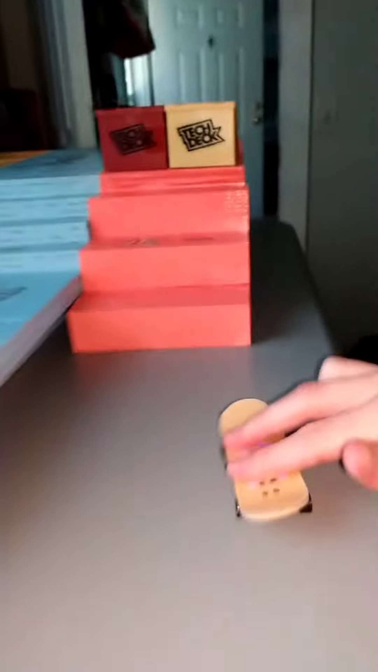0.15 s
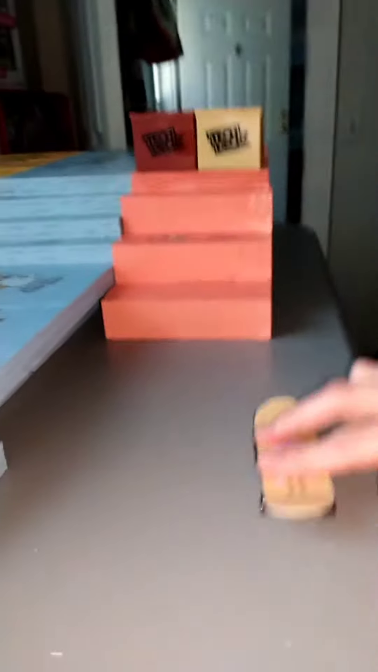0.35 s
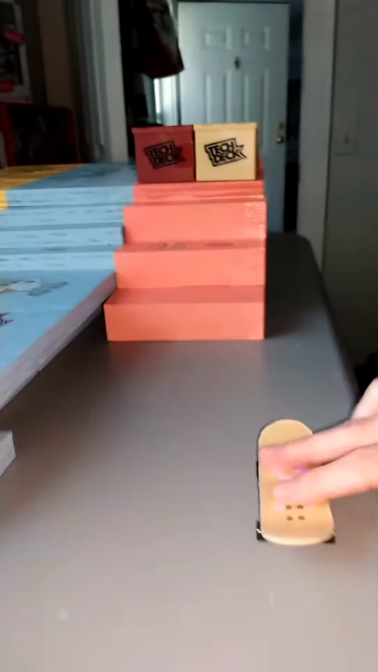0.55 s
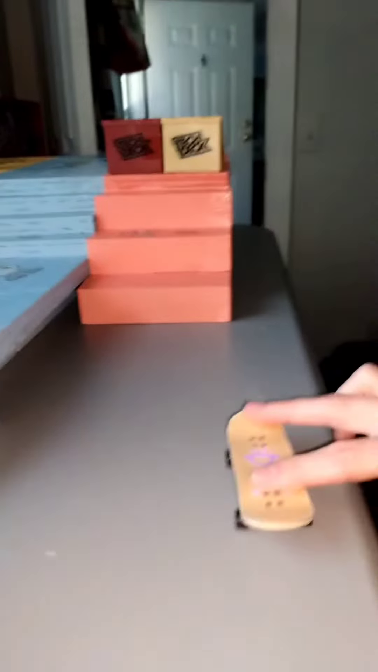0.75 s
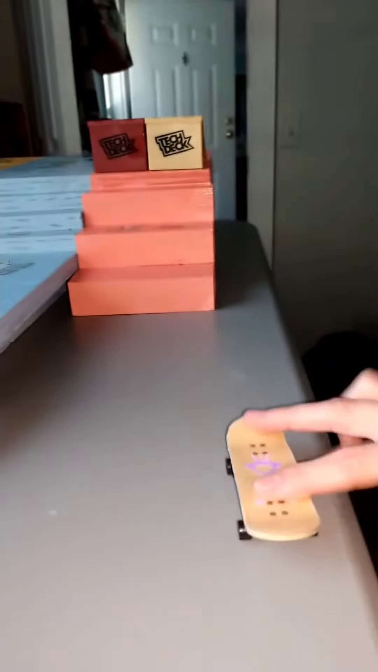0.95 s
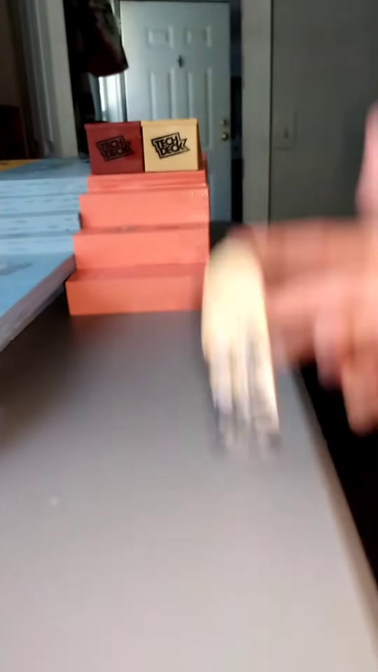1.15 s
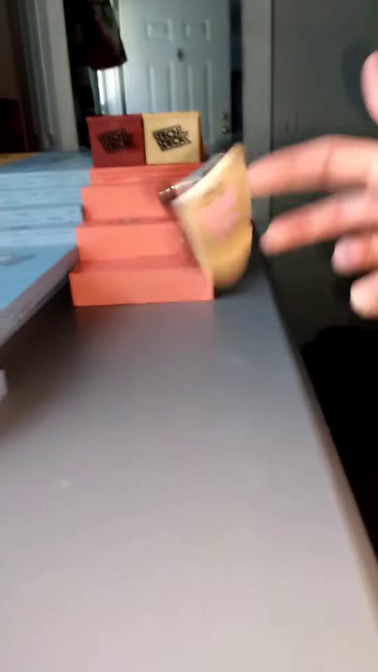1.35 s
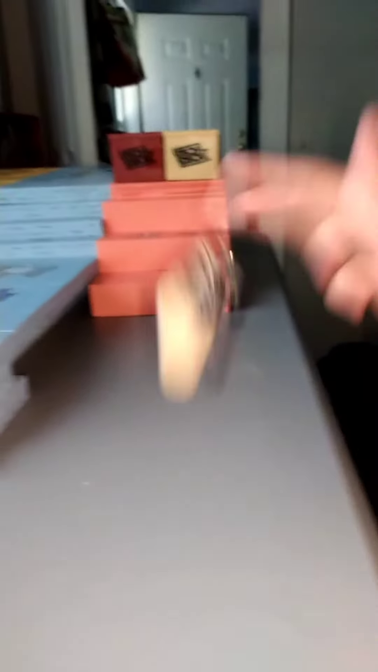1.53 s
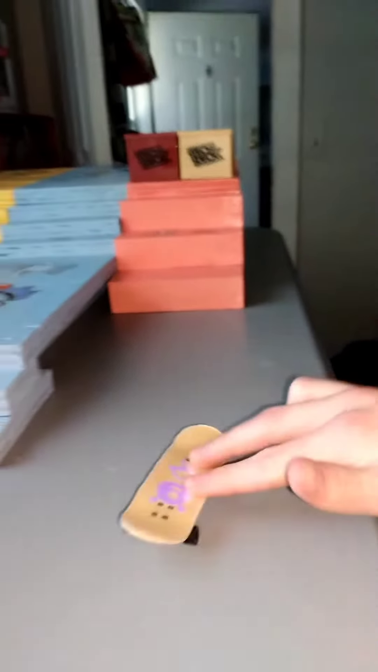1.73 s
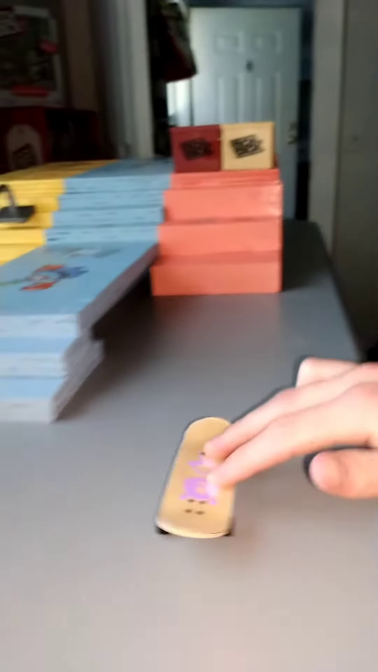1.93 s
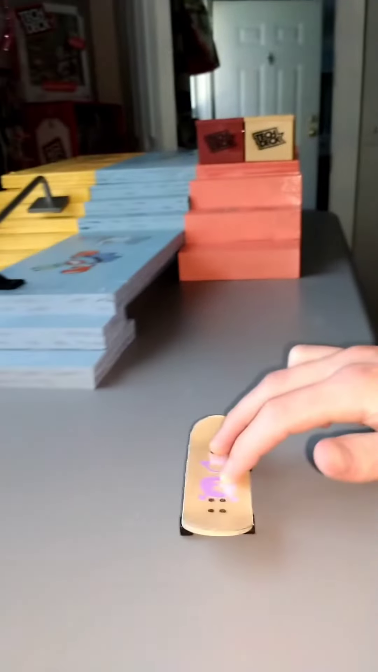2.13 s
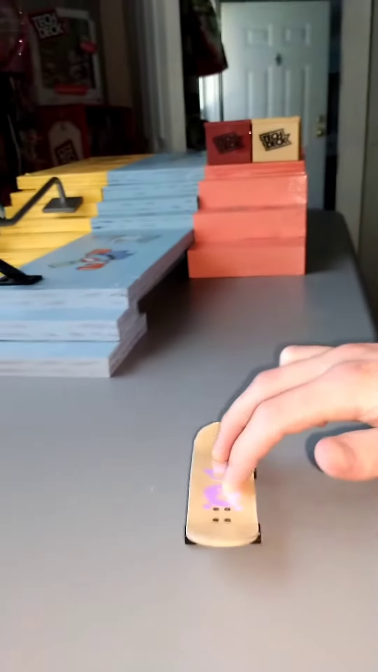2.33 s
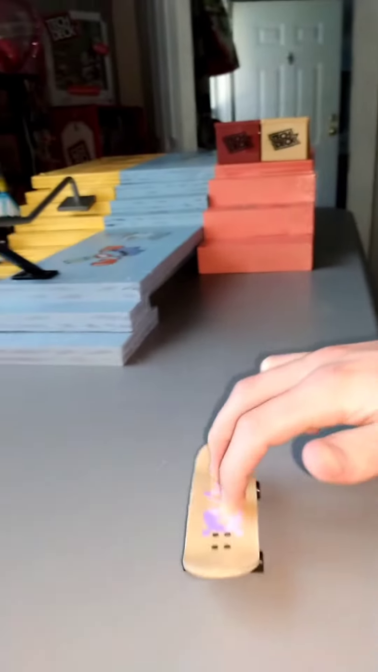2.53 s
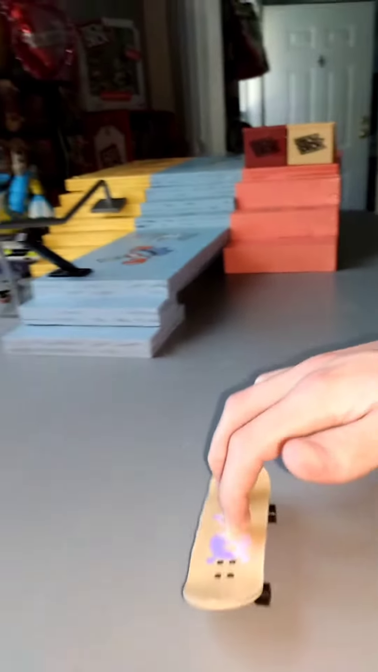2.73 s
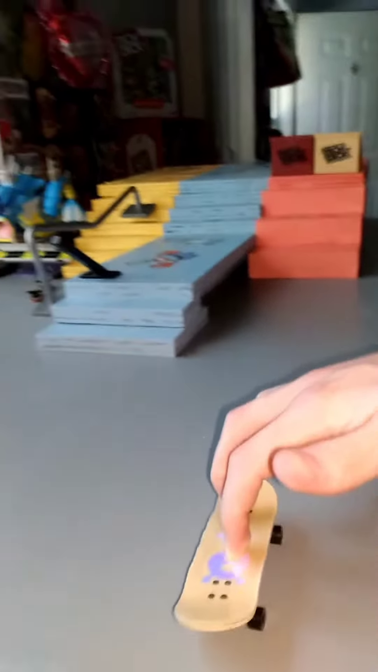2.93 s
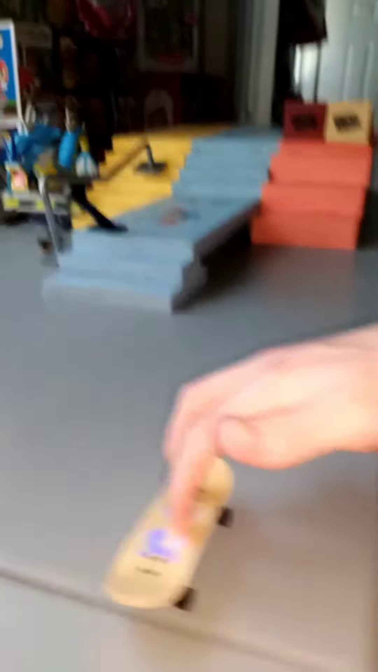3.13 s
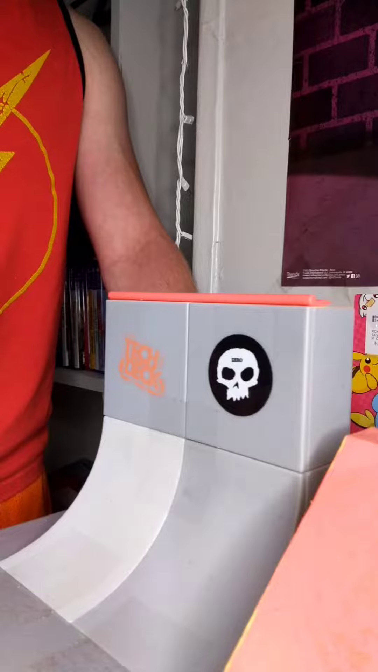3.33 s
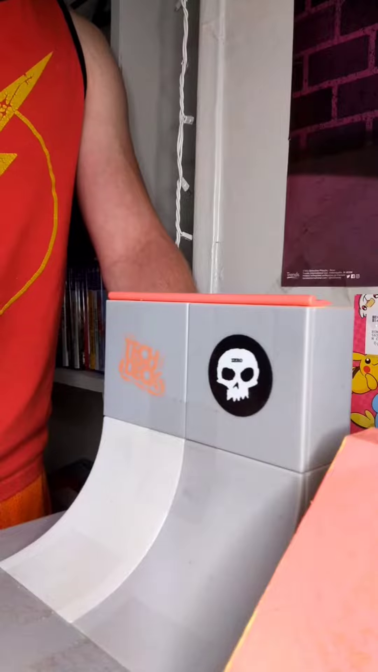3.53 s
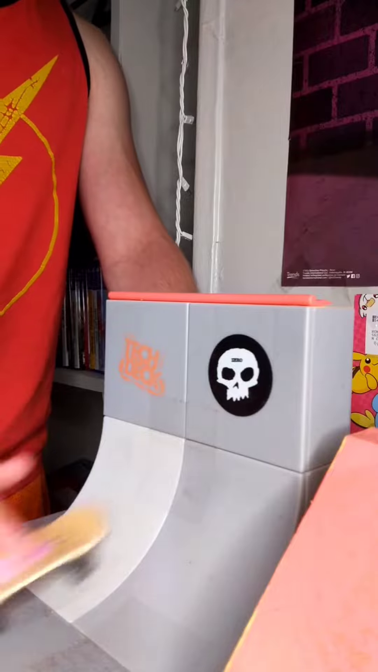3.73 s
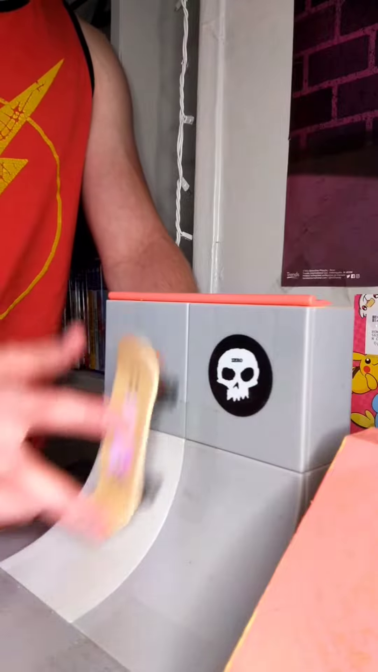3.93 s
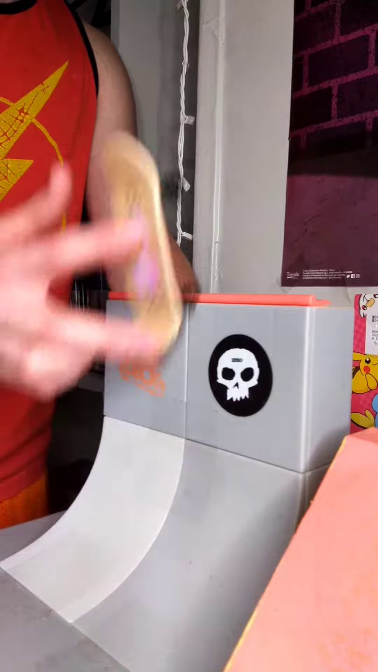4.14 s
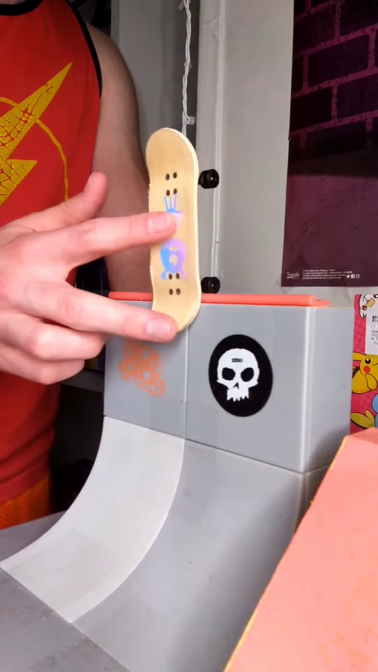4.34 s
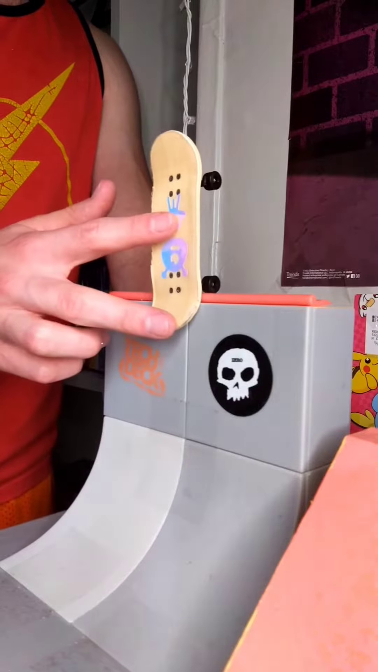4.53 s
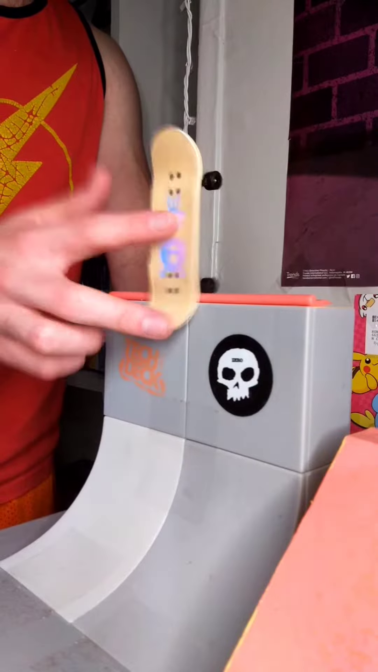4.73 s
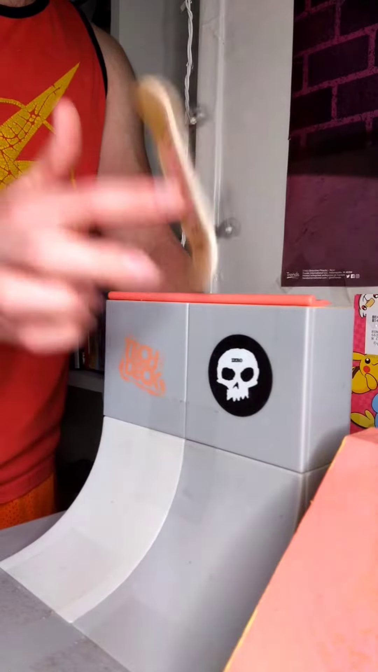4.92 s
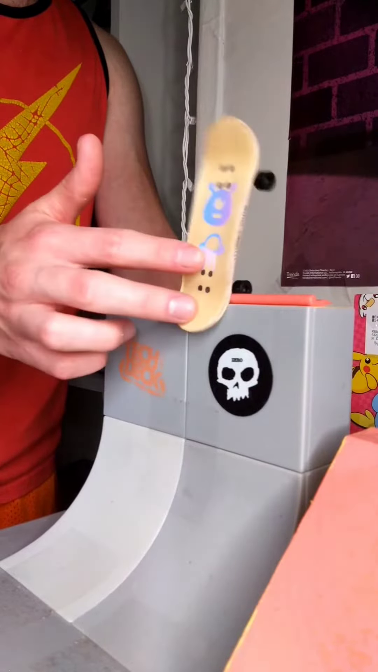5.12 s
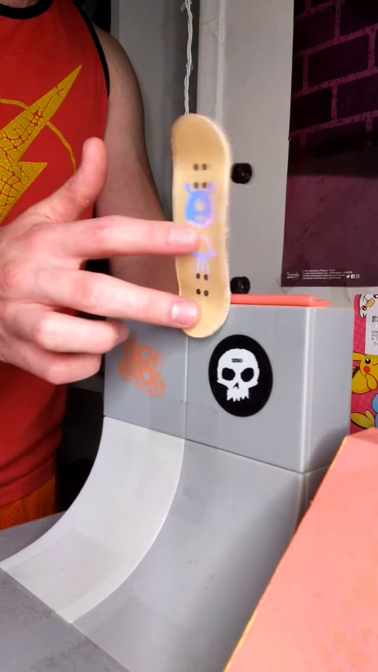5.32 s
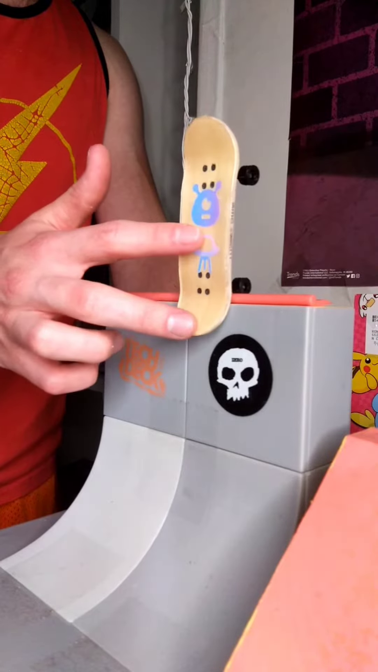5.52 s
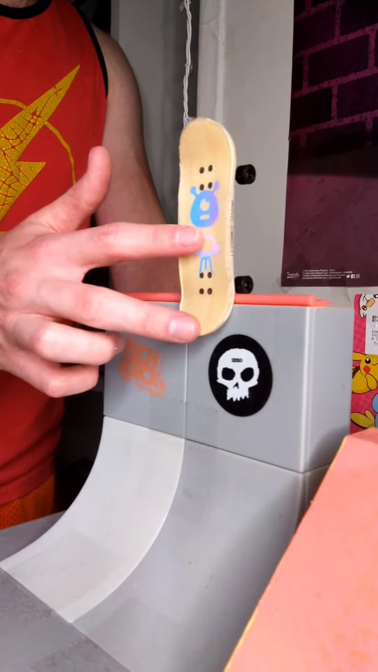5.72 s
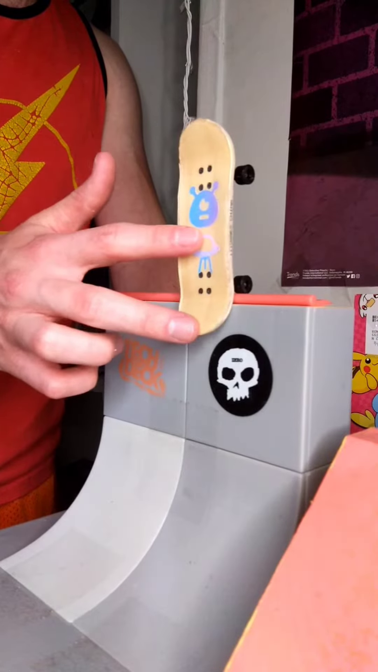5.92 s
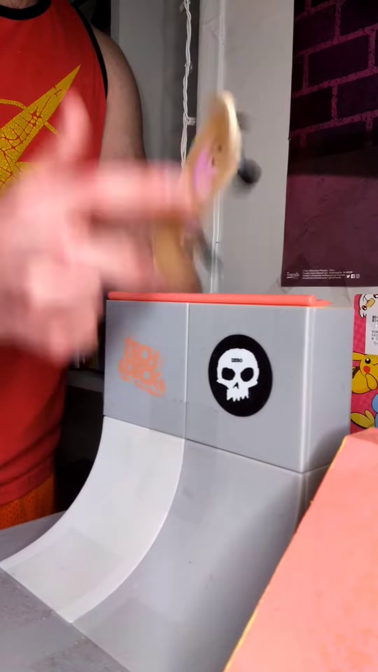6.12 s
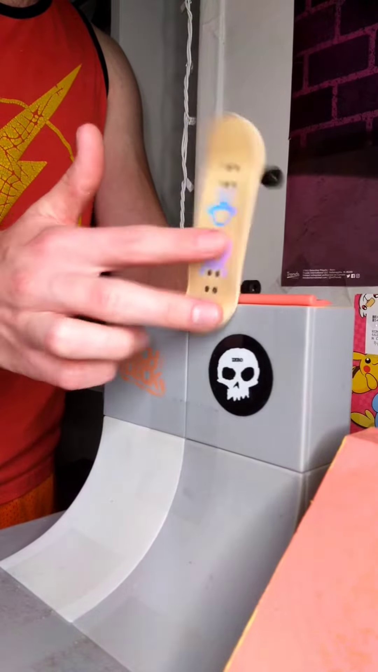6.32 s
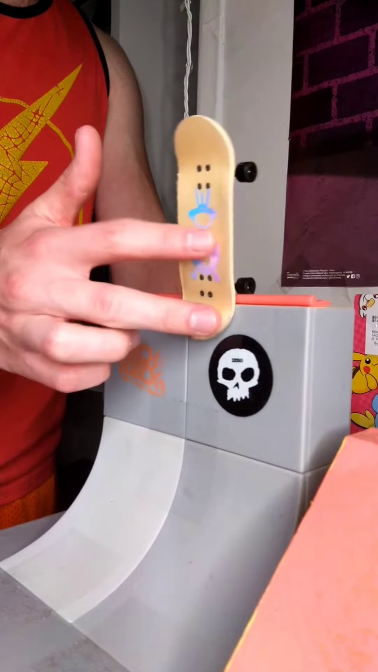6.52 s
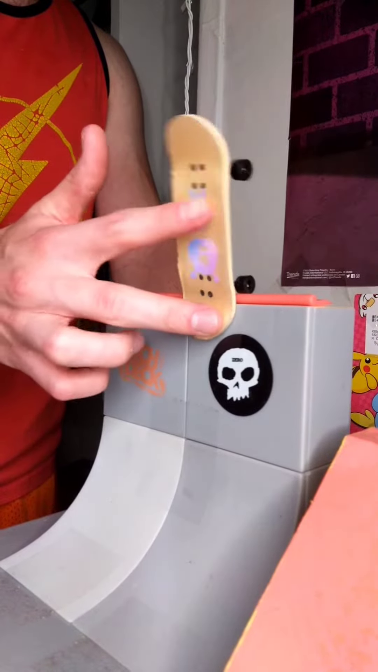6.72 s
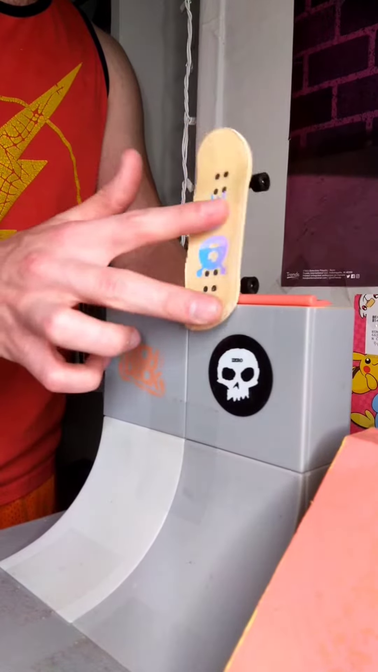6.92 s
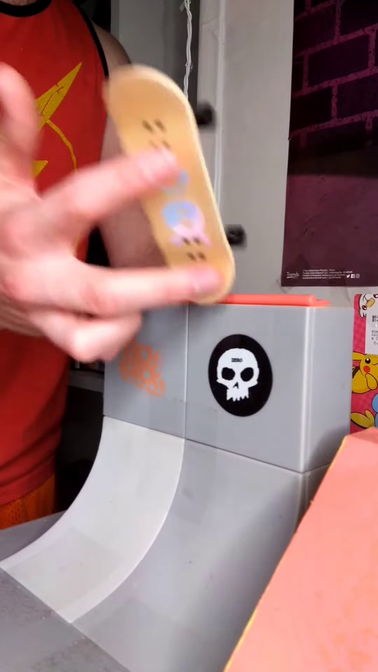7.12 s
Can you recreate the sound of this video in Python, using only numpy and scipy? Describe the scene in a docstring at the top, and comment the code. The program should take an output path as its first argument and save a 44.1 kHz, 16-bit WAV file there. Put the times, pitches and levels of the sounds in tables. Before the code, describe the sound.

A tiny wooden skateboard pops and lands with loud overloaded clacks on a table, rolls faintly, then rides up a hollow plastic ramp with lighter clicks.

```python
"""A small wooden fingerboard pops, lands and rolls on a table top, then rides up a hollow plastic ramp
and is flipped on its lip. Knocks are noise bursts and rolling is gritty noise; both drive the damped
modes of deck, axles and the surface below, a low thump and, on the slope, a gliding hollow resonance.
The room answers briefly over a rumbling room tone. A narrow-band phone microphone overloads, and the
signal briefly drops out."""
import sys
import numpy as np
from scipy import signal
from scipy.fft import rfft, irfft
from scipy.io import wavfile
from scipy.ndimage import uniform_filter1d

SR = 44100
rng = np.random.default_rng(int(sys.argv[2]) if len(sys.argv) > 2 else 0)


def to_wav(s):
    """Save 16-bit WAV."""
    ch = np.atleast_2d(s).T  # columns
    pcm = np.round(np.clip(ch, -1, 1) * 32767)  # PCM
    wavfile.write(sys.argv[1], SR, pcm.astype(np.int16))


N = 320339

# Surface below, start of each stretch [t/s]: table edge, table middle, ramp slope, ramp lip; last is the end
SURFACE_FROM_S = [0, 1.09, 3.13, 4.17, 8]


def gain_of(db):
    """Amplitude factor of a level in dB."""
    return 10 ** (np.asarray(db) / 20)


def evened(x):
    """Scales to RMS 1."""
    return x / np.sqrt(np.mean(x ** 2) + 1e-20)


def smoothed_twice(x, size_1, size_2):
    """Two moving averages in a row."""
    return uniform_filter1d(uniform_filter1d(x, size=size_1), size=size_2)


def patches_of(noise, frames, bins):
    """Smooths noise [bin, frame] into time-frequency patches of RMS 1."""
    return evened(uniform_filter1d(uniform_filter1d(noise, size=bins, axis=0), size=frames, axis=1))


def read(points, hz):
    """Interpolates a table of (f/Hz, value) over log frequency."""
    f, value = np.transpose(points)
    return np.interp(np.log(hz + 1), np.log(f + 1), value)


def body(modes, lo_hz, hi_hz, broad_db):
    """Impulse response to one tap: decaying modes plus a direct broadband click, band-passed, energy 1."""
    t = np.arange(6000) / SR
    rings = np.zeros(len(t))
    for k, (hz, width_hz, db) in enumerate(modes):
        width_hz = max(width_hz, hz / 90, 16)  # wood and plastic damp quickly
        decay = np.exp(-np.pi * width_hz * t)
        level = (-1) ** k * gain_of(db) * width_hz / SR * 2 * np.pi
        rings += level * decay * np.sin(2 * np.pi * hz * t)
    rings[0] += gain_of(broad_db)
    band = signal.butter(2, [lo_hz, hi_hz], "band", fs=SR, output="sos")
    rings = signal.sosfilt(band, rings)
    return rings / np.linalg.norm(rings)


def resonate(x, hz, width_hz):
    """Gliding resonance: shifts the curve hz to zero, smooths, shifts back; white noise keeps its power."""
    turn = np.exp(2j * np.pi * np.cumsum(hz) / SR)
    r = np.exp(-np.pi * width_hz / SR)
    smooth = signal.lfilter([1], [1, -r], x / turn)
    return np.sqrt(2 * (1 - r ** 2)) * (turn * smooth).real


def hum():
    """Room tone: noise shaped by a spectrum: lumpy low rumble that swells, fuzzy drone, faint steady hiss."""
    # Relative spectrum [f/Hz, density/dB per Hz]
    spectrum = [(15, -31), (25, 0.5), (54, 0), (129, -14), (168, 2.5), (209, -40.5), (242, -13), (273, -29),
                (789, -31.5), (890, -33.5), (1510, -37.5), (8000, -50.5), (10400, -88), (17600, -120)]
    upper_db, rumble_db = -39, -46  # gain well above and well below 220 Hz
    swell_rms_db, patchy_rms_db = 3, 2.5
    frames, hz = N // 512 + 5, np.fft.rfftfreq(2048, 1 / SR)
    a, b, lumps = rng.standard_normal((frames, 1025, 3)).T
    lumps = patches_of(lumps, 6, 8)
    swell = evened(uniform_filter1d(rng.standard_normal(frames), size=16))
    low_db = rumble_db - upper_db + swell_rms_db * swell
    z = (a + 1j * b) * gain_of(read(spectrum, hz)[:, None] + patchy_rms_db * lumps)
    z /= np.sqrt(np.mean(signal.istft(z, nperseg=2048, noverlap=1536)[1] ** 2))
    z *= gain_of(upper_db + low_db / (1 + (hz[:, None] / 220) ** 4))
    return signal.istft(z, nperseg=2048, noverlap=1536)[1][:N]


def room(x):
    """Reverb: sparse taps of random sign, one in every 20 samples, each band dying at its own speed."""
    # Decay per band [f/Hz, time constant/s]; 60 dB of fall takes this times 0.019 / 0.015
    decay_s = [(150, 0.13), (400, 0.23), (1000, 0.2), (2800, 0.22), (7300, 0.2)]
    taps = np.zeros(SR)
    at = np.arange(200, SR - 20, 20) + rng.integers(0, 20, (SR - 201) // 20)
    taps[at] = rng.choice([-1., 1.], at.shape)
    hz, t, z = signal.stft(taps, SR, nperseg=256)
    late = np.logaddexp(0, (t - .06) / 0.019) * 0.015  # echoes stay even up to 0.06 s, then decay
    fade = gain_of(-60 * late / read(decay_s, hz)[:, None])
    tail = signal.istft(z * fade, SR, nperseg=256)[1]
    return signal.oaconvolve(x, tail / np.linalg.norm(tail))[:N]


def thump(knock_drive, surface_roll):
    """Low thump: two modes below 190 Hz, shaken by knocks and by rolling on the table."""
    t = np.arange(N) / SR
    on_table = t < SURFACE_FROM_S[2]
    drive = knock_drive + gain_of(-7.5) * surface_roll * on_table
    modes = [(67.8, 17, 0.017), (135, 16, 0.0097)]  # f/Hz, width/Hz, level/dB
    return signal.oaconvolve(drive, body(modes, 33, 190, -28.0))[:N]


def hollow(surface):
    """Hollow under the slope: a resonance of the surface drive, mostly rising as the wheels climb."""
    # Cavity track [t/s, f/Hz, level/dB re surface drive]
    track = [(3.3, 315, 10.5), (3.5, 363, -4.5), (3.598, 460, 1), (3.72, 460, -2), (3.799, 717, 0),
             (3.899, 796, -7), (4.1, 560, -19), (4.17, 607, 8)]
    t = np.arange(N) / SR
    s, hz, db = np.transpose(track)
    on_slope = (t > s[0]) * (t < s[-1])
    drive = surface * on_slope * gain_of(np.interp(t, s, db))
    return resonate(drive, np.interp(t, s, hz), 33)


def grit(per_s, spread_db, smooth):
    """Force on rolling wheels: specks of uneven size over a smooth rub, in short scrapes; RMS 1."""
    size_db = spread_db * np.minimum(rng.exponential(1, N), 3)
    size = gain_of(size_db) * rng.standard_normal(N)
    specks = evened(size * (rng.random(N) < per_s / SR))
    scrapes = gain_of(1.9 * evened(smoothed_twice(rng.standard_normal(N), 300, 150)))
    return evened(scrapes * (specks + smooth * rng.standard_normal(N)))


def rolls():
    """Drive of deck, surface and axles: grit under the level curves of rolls and scrapes."""
    # Wheel force at table edge, in table middle, up the slope; each [t/s, deck/dB, surface/dB]
    roll_levels = [
        [(.74, -61, -62), (.757, -41.5, -55), (.825, -49, -47), (.887, -43, -51), (.905, -41.5, -50.5),
         (1.001, -39, -52), (1.021, -46, -54.5), (1.09, -55, -48)],
        [(1.92, -38.5, -39), (2.04, -46.5, -29.5), (2.126, -52, -44), (2.3, -63, -45), (2.44, -47.5, -37.5),
         (2.592, -58, -40), (2.73, -56, -36), (2.782, -52, -47), (2.896, -62, -49.5), (2.968, -44, -50),
         (3.115, -51.5, -39.5)],
        [(3.3, -65, -50.5), (3.395, -45.5, -43), (3.487, -25.5, -27.5), (3.72, -29, -28.5),
         (3.781, -37.5, -28.5), (3.795, -22, -24), (3.905, -25, -28), (3.999, -49, -41.5), (4.012, -36.5, -33),
         (4.065, -23, -31), (4.123, -26.5, -38), (4.17, -45.5, -58)],
    ]
    # Axle level re deck in each roll [level/dB]
    axles_re_deck_db = [-15, -15, -6.5]
    # Short scrapes and rattles, one a faint noise swell just before a landing; quick rise, steady fade:
    # [peak t/s, rise/s, fade/dB per s, deck/dB, surface/dB, axles/dB]
    scrape_levels = [(.33, 0.023, 322, -38, -45, -45), (0.491, 0.2, 157, -40, -46, -50),
                     (.538, .03, 320.5, -37, -45.5, -58), (.658, .04, 300, -44, -41, -54),
                     (1.135, 0.043, 141, -23, -25, -24.5), (1.645, 0.021, 104, -58, -37, -37),
                     (1.898, 0.049, 295.5, -33, -30, -35), (3.162, 0.012, 230.5, -47.5, -41, -52.5),
                     (4.769, 0.025, 171.5, -45, -45.5, -40.5), (6.135, 0.03, 250.5, -45, -50.5, -41.5),
                     (7.05, 0.0097, 280.5, -44.5, -48.5, -46.5)]
    rise_db = 22  # climb during the rise time
    bump_rms_db, bump_s = 2, 0.031  # random jolts of the force
    t = np.arange(N) / SR
    level = np.zeros((3, N))
    for rows, axles_db in zip(roll_levels, axles_re_deck_db):
        s, deck_db, surface_db = np.transpose(rows)
        fade = np.clip(np.minimum(t - s[0], s[-1] - t) / .01, 0, 1)
        curves_db = [np.interp(t, s, c) for c in (deck_db, surface_db, deck_db + axles_db)]
        level += fade * gain_of(curves_db)
    span = round(bump_s * SR)
    level *= gain_of(bump_rms_db * evened(smoothed_twice(rng.standard_normal(N), span, span)))
    for peak_s, rise_s, fade_db_per_s, *db in scrape_levels:
        after = t - peak_s
        shape_db = np.minimum(rise_db * after / rise_s, -fade_db_per_s * after)
        level += gain_of(db)[:, None] * gain_of(shape_db)
    return level * grit(4000, 3.3, 2.2)


def knocks():
    """Drive of deck, surface, axles and thump, light and hard: a short cluster of contacts per knock."""
    # Knocks [t/s, deck/dB, surface/dB, axles/dB, contact/ms (2 at least)]
    hits = [(0.0513, -5.5, 5, -4.5, 2.56), (0.0649, -12.5, -5, -43, 5.4), (0.1207, 3, 1.5, 3, 7.4),
            (0.1322, 9.5, 0, 7, 3.2), (0.1413, 17.5, 16, 12.5, 2.27), (0.4803, -23, -52, -45, 4.6),
            (0.6391, -29.5, -39, -49, 12.6), (0.6551, -27.5, -50, -44, 2.5), (0.81, -43, -41, -33.5, 2.1),
            (1.0938, -15.5, -27.5, -25, 16), (1.1035, -3, -18, -2.5, 1.6), (1.1189, -2.5, -14, -3, 1.66),
            (1.6523, -3.5, -4.5, 6.5, 1.5), (1.6842, -5, 3.5, -20, 2.6), (1.6858, -9, -17, -4.5, 11),
            (1.6968, 0, 2, -9, 9.3), (1.7064, 15, 14.5, 14.5, 2.96), (1.9622, -20.5, -36, -32, 1.8),
            (1.9879, -20.5, -41.5, -36, 3.3), (2.4309, -30, -50, -53, 3.2), (2.6607, -47.5, -29, -46, 4.4),
            (2.7577, -42, -53.5, -36.5, 2.5), (2.9281, -39.5, -31.5, -42.5, 2.4),
            (2.9631, -27.5, -28.5, -43, 2.8), (3.0874, -36, -47, -44, 3.5), (3.3122, -39, -50, -51.5, 3),
            (3.79, -14, -19.5, -24, 2.9), (3.8126, -15, -7.5, -10, 1.5), (3.831, -10.5, -18, -17, 3.7),
            (3.8435, -21, -26, -9.5, 2.4), (3.8906, -8, -14, -8.5, 1.6), (3.943, -33, -30, -15.5, 2.7),
            (4.0059, -10.5, -22, -12, 2.4), (4.055, -17, -37, -28, 2.8), (4.18, -13.5, -50, -17.5, 3.7),
            (4.2066, -15, -25, -15.5, 6), (4.2412, -19, -14, -12.5, 3), (4.7601, -43, -46, -24.5, 2.4),
            (4.793, -31, -45, -50, 2.8), (4.9021, -40, -59, -46, 1.7), (4.9512, -31, -6.5, 0, 2.9),
            (4.958, -28, -7.5, -4, 2.9), (4.996, -21, -19.5, -11.5, 6), (5.0292, -21, -12, 0.5, 2.9),
            (5.035, -2, -17.5, -23, 3), (5.044, -19, -34, -11.5, 3.6), (5.375, -39, -41, -45.5, 9.8),
            (5.695, -31.5, -32, -35, 3.6), (6.112, -44, -45, -39, 3.5), (6.136, -31.5, -40, -42, 3.8),
            (6.2594, -20, -29.5, -8, 4.8), (6.2647, -9, -20, 1.5, 4.1), (6.27, -6, -16, -8, 4.5),
            (6.2933, -12, -14, -11.5, 2.9), (6.34, -23.5, -24, -23, 6.2), (7.0336, -34.5, -40, -24, 5.3)]
    # Thump level on each surface at 0 dB surface drive [level/dB]
    thump_base_db = [-24, -26.5, -27.5, -19]
    thump_slope = 0.36  # dB of thump per dB of surface drive
    drive = np.zeros((2, 4, N))
    after_s = np.arange(4096) / SR
    for (s, *db, contact_ms), noise in zip(hits, rng.standard_normal((len(hits), 4096))):
        below = np.searchsorted(SURFACE_FROM_S, s) - 1
        db.append(thump_base_db[below] + thump_slope * db[1])
        u = 1000 * after_s / max(contact_ms, 2)
        hard = np.clip(1 + max(db) / 30, .1, 1)
        shape = np.exp(-u) * (1 - np.exp(-u / (.5 - 0.09 * hard)))  # light taps build up more softly
        # flat spectrum: the contacts together push all frequencies alike
        burst = irfft(np.exp(1j * np.angle(rfft(noise * shape))))
        burst *= shape / np.sqrt(uniform_filter1d(burst ** 2, size=32) + 1e-9)
        at = round(s * SR)
        share = np.sqrt([[[1 - hard]], [[hard]]])
        drive[:, :, at:at + 4096] += share * gain_of(db)[:, None] * burst
    return drive


def ring(deck, surface, axles, broad_db):
    """The forces ring the axles, the deck as the fingers hold it and whichever surface is below."""
    # Modes of each surface [f/Hz, width/Hz, level/dB]; body() sets a least width, here and below
    table_edge = [(288, 610, -5), (400, 60, -8.5), (574, 55, -1), (954, 30, -6.5), (1025, 77, 2.5)]
    table_middle = [(230, 75, 3.5), (289, 70, 7), (360, 23, 9.5), (430, 74, -13.5), (778, 49, -12.5),
                    (786, 60, -12.5), (930, 56, -4.5)]
    ramp_slope = [(322, 17, -2), (458, 27, 5), (823, 430, 5.5), (1213, 80, 11)]
    ramp_lip = [(244, 180, -10.5), (498, 30, -1), (640, 280, -3.5), (774, 44, 5.5), (1250, 26, -5)]
    # Low cutoff of each surface [f/Hz]
    surface_low_hz = [172, 168, 222, 182]
    # Deck modes at each place [f/Hz, width/Hz, level/dB]
    deck_at_edge = [(1529, 52, 1.5), (1800, 19, -4.5), (2376, 80, -1), (2520, 23, -0.5), (2840, 89, -3),
                    (3260, 28, -1.5), (3596, 36, -4), (3824, 41, -12.5), (4070, 29, -11), (4350, 95, -8),
                    (5740, 71, -9.5)]
    deck_at_middle = [(1548, 64, -1), (2170, 120, 3), (2570, 33, -2.5), (2784, 37, -10.5), (3480, 58, -4),
                      (3560, 120, -7), (4390, 99, -10), (4860, 42, -4), (5350, 49, -13)]
    deck_on_slope = [(1613, 290, 5.8), (2310, 410, 6.4), (2820, 160, 7.4), (3090, 120, 8.4),
                     (3625, 265, 8.5), (4660, 1170, 1.7)]
    deck_on_lip = [(2366, 24, -12), (2727, 34, -5), (3180, 130, -4.5), (3440, 65, -2), (4440, 520, -12.5),
                   (4680, 75, -4.5), (5060, 53, -9), (5280, 33, -5), (5630, 41, -6), (6140, 88, 3.5)]
    # Start of each deck mode set, then the end [t/s]
    deck_from_s = [0, 1.645, 3.13, 4.17, 8]
    # Axle modes [f/Hz, width/Hz, level/dB]
    axle_modes = [(4590, 96, -4), (5780, 60, 2), (6510, 150, 4.5), (7066, 420, 4), (7783, 160, -3)]
    surfaces = [table_edge, table_middle, ramp_slope, ramp_lip]
    decks = [deck_at_edge, deck_at_middle, deck_on_slope, deck_on_lip]
    t = np.arange(N) / SR
    out = signal.oaconvolve(axles, body(axle_modes, 4500, 9000, broad_db + 3))[:N]
    for k in range(4):
        here = (t >= SURFACE_FROM_S[k]) & (t < SURFACE_FROM_S[k + 1])
        surface_body = body(surfaces[k], surface_low_hz[k], 1300, broad_db + 2.0)
        out += signal.oaconvolve(surface * here, surface_body)[:N]
        here = (t >= deck_from_s[k]) & (t < deck_from_s[k + 1])
        deck_body = body(decks[k], 1500, 5400, broad_db)
        # sign flipped so that the neighbouring filter bands do not cancel where they cross
        out -= signal.oaconvolve(deck * here, deck_body)[:N]
    return out


def wander(x, patchy_rms_db):
    """Shifting contact spots favour now one ring, now another: random time-frequency gain."""
    z = signal.stft(x, nperseg=1024, noverlap=768)[2]
    patches = patches_of(rng.standard_normal(z.shape[::-1]).T, 14, 8)
    return signal.istft(z * gain_of(patchy_rms_db * patches), nperseg=1024, noverlap=768)[1][:N]


def board():
    """Rolling and light taps sing in the main modes; a hard knock adds far more broadband response."""
    light, hard = knocks()
    wheels = rolls()
    deck, surface, axles = wheels + light[:3]
    rolling = wander(ring(deck, surface, axles, -19) + hollow(surface), 3.5)
    hard_knocks = ring(*hard[:3], -1.8)
    return rolling + hard_knocks + thump(light[3] + hard[3], wheels[1])


def scene():
    """Board, its room reverb and the room tone, mono."""
    near = board()
    return (near + gain_of(-6.5) * room(near) + hum())[None]


def record(dry):
    """Narrow microphone band, hard overload that splashes above it, dropouts, then the band limit."""
    # Dropouts [start t/s, end t/s, gain left/dB]
    dropouts = [(.0795, .0995, -45), (.0995, .121, -110), (.1238, .1312, -42), (1.6565, 1.6848, -110),
                (1.6858, 1.6875, -45), (3.117, 3.1435, -45)]
    stop_hz, limit_hz = 1.16 * 7714, 16400
    low_pass = signal.cheby2(16, 70, stop_hz, fs=SR, output="sos")
    high_pass = signal.butter(2, 32, "high", fs=SR, output="sos")
    narrow = signal.sosfilt(high_pass, signal.sosfilt(low_pass, dry))
    out = .98 * narrow / (1 + abs(narrow) ** 5) ** (1 / 5)
    t = np.arange(N) / SR
    for start_s, end_s, left_db in dropouts:
        out = np.where((t > start_s) & (t < end_s), gain_of(left_db) * out, out)
    band_limit = signal.firwin(511, limit_hz, window=("kaiser", 9), fs=SR)
    return signal.oaconvolve(out, band_limit[None], "same")


dry = scene()
out = record(dry)
to_wav(out)
```